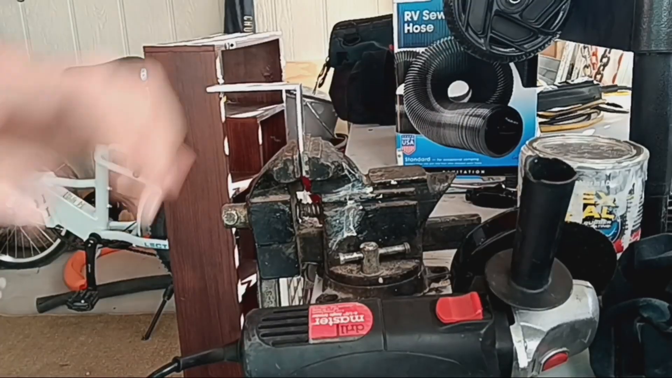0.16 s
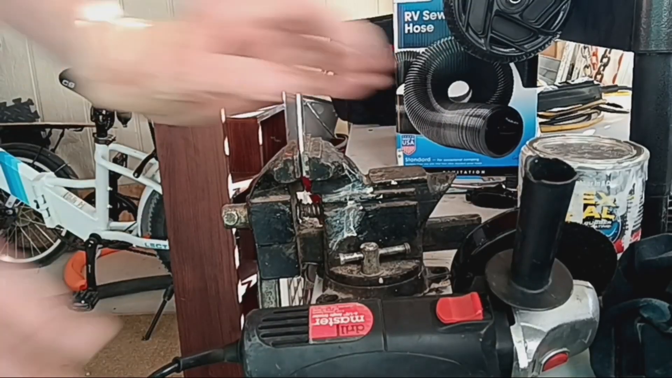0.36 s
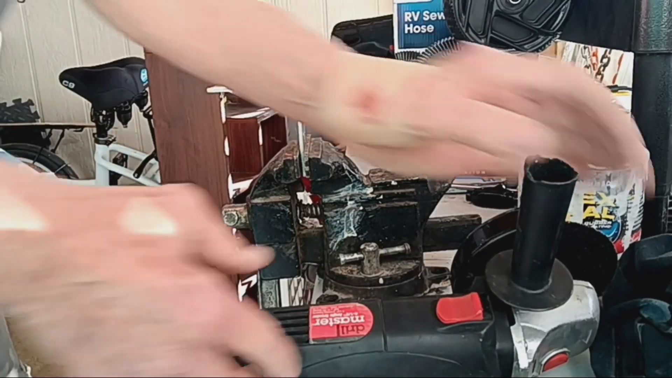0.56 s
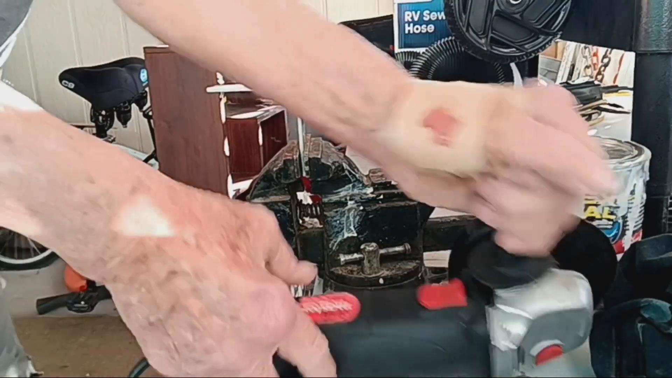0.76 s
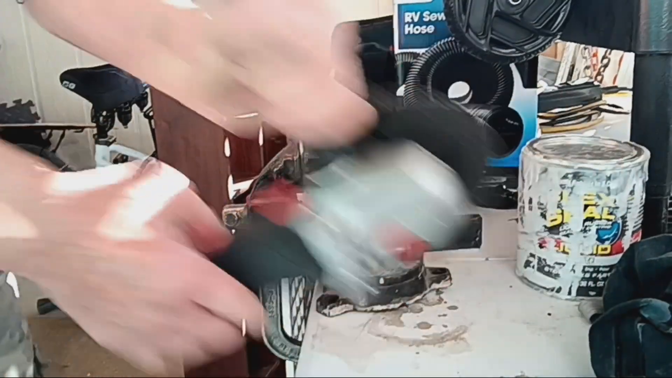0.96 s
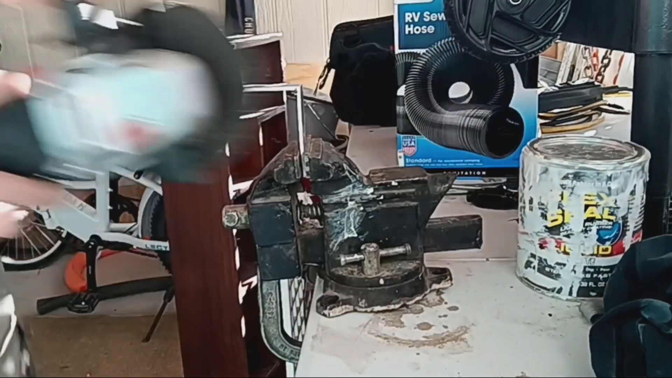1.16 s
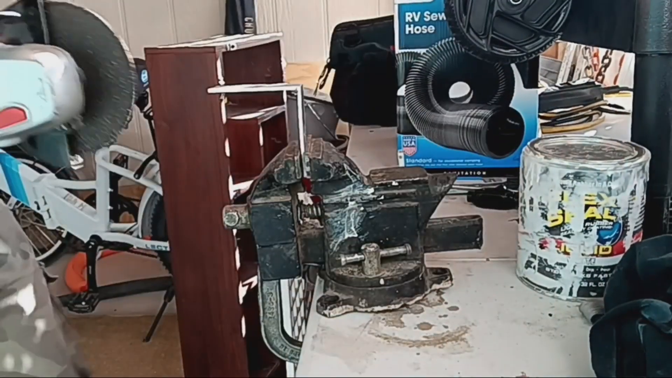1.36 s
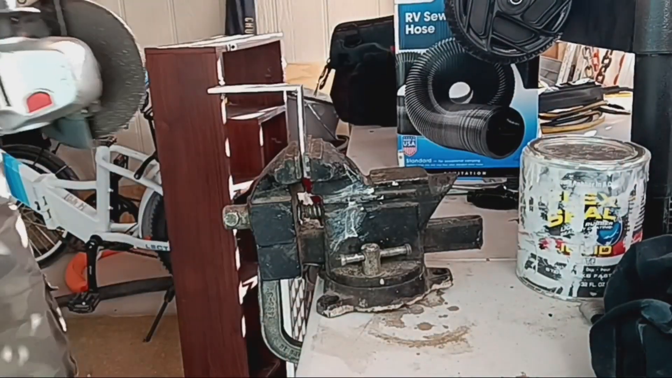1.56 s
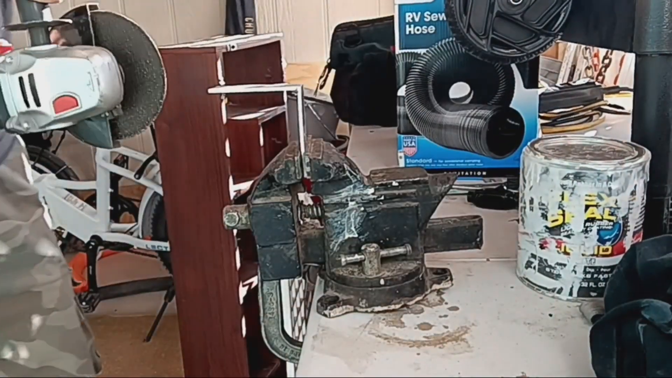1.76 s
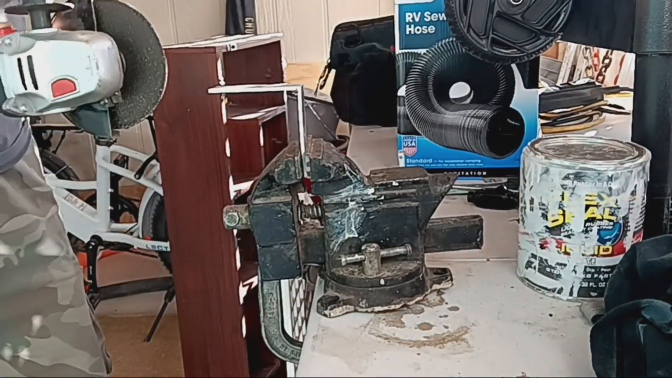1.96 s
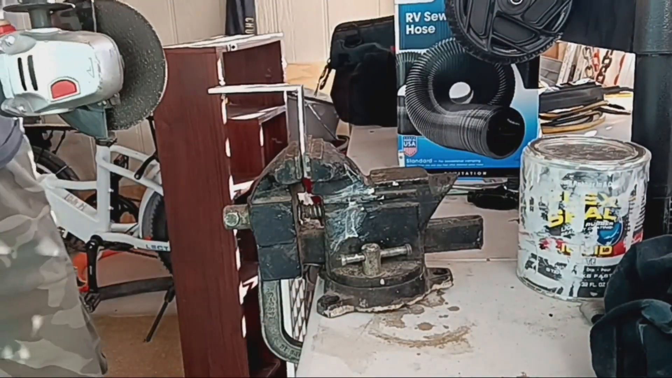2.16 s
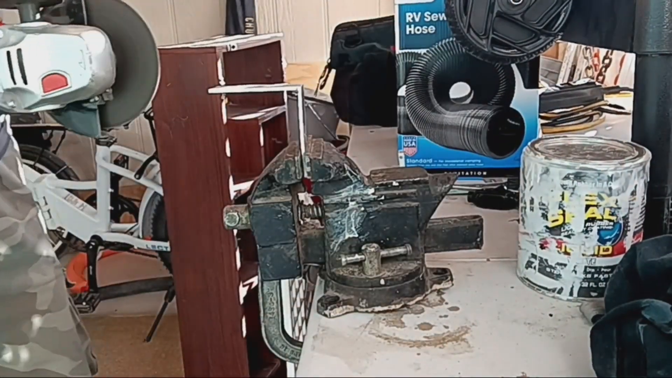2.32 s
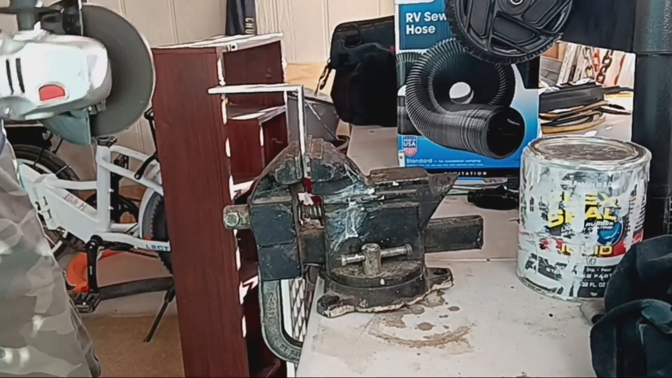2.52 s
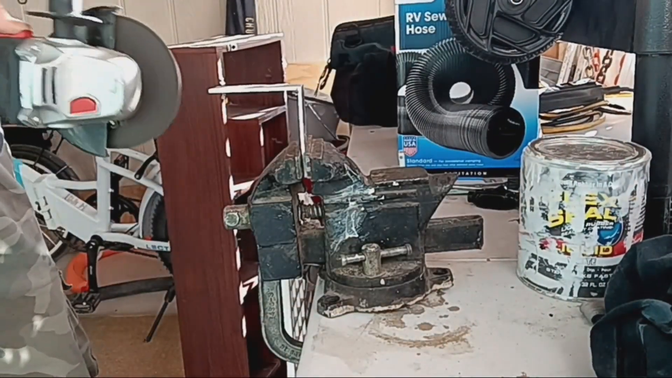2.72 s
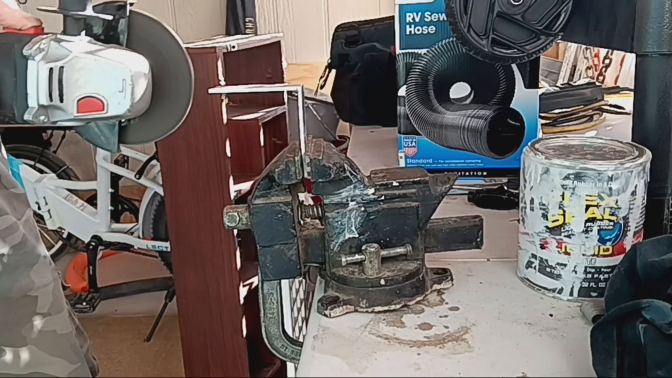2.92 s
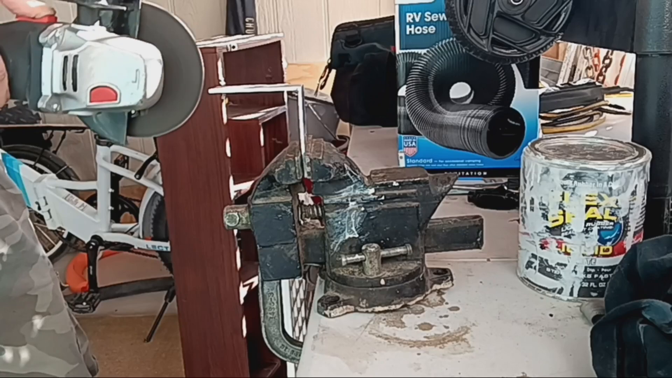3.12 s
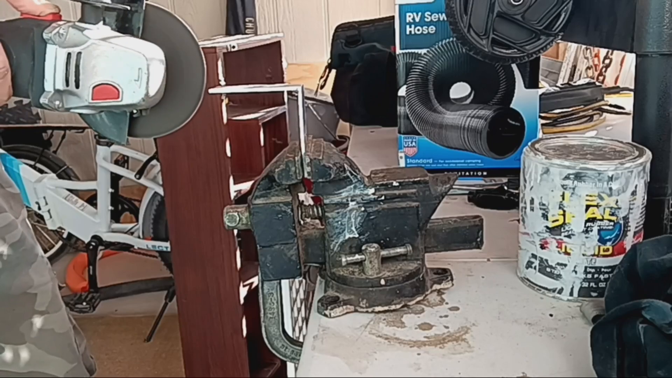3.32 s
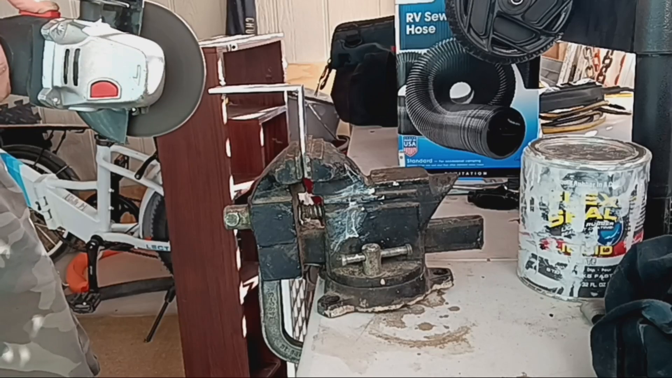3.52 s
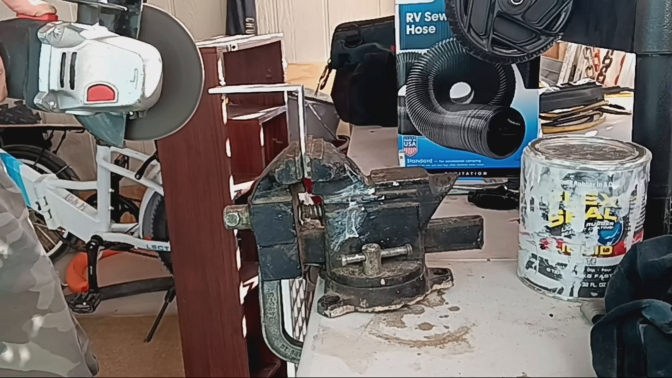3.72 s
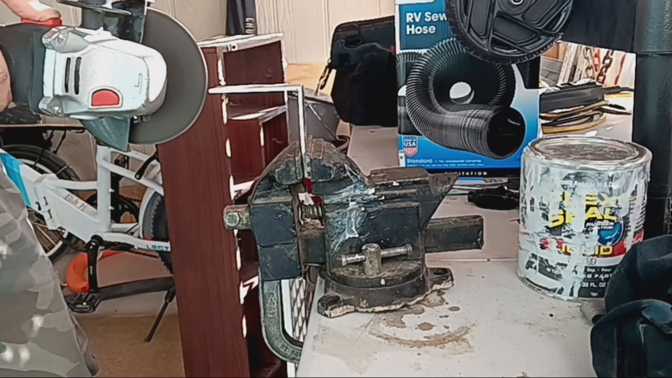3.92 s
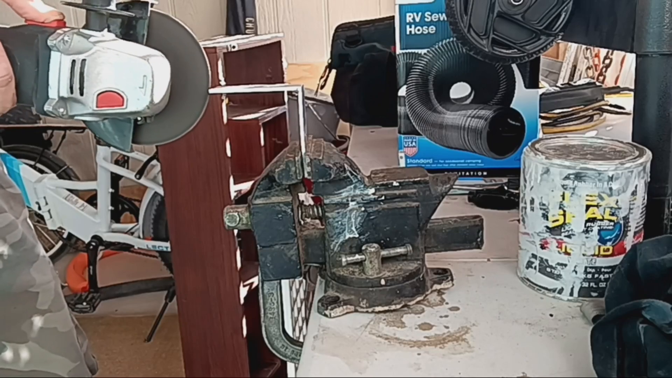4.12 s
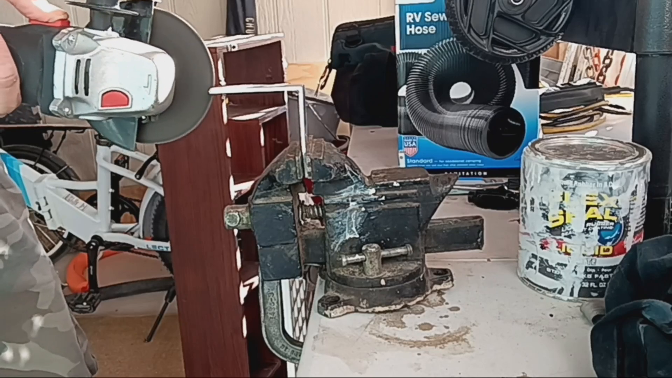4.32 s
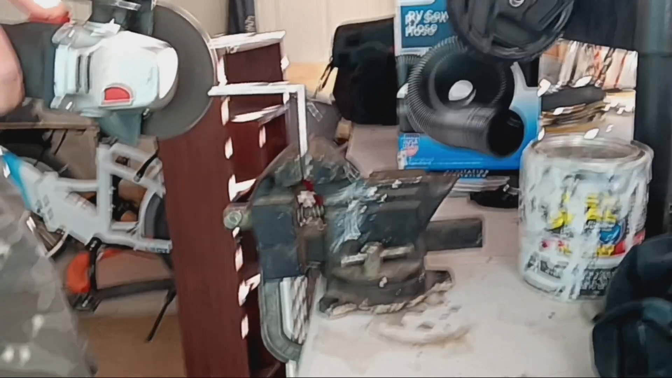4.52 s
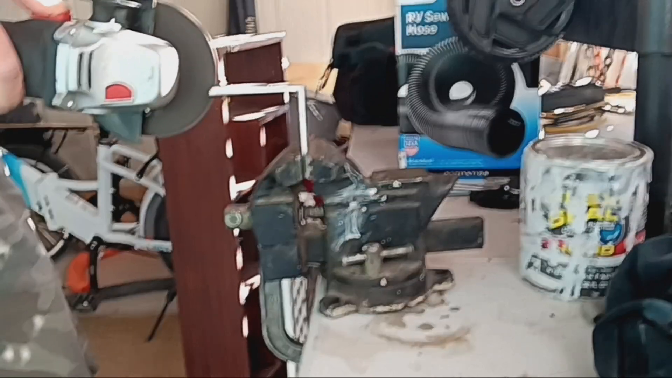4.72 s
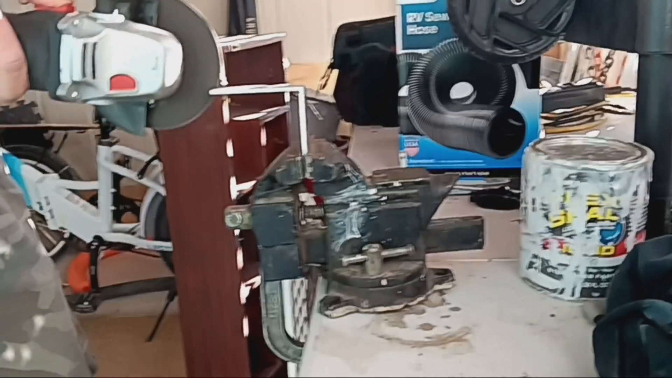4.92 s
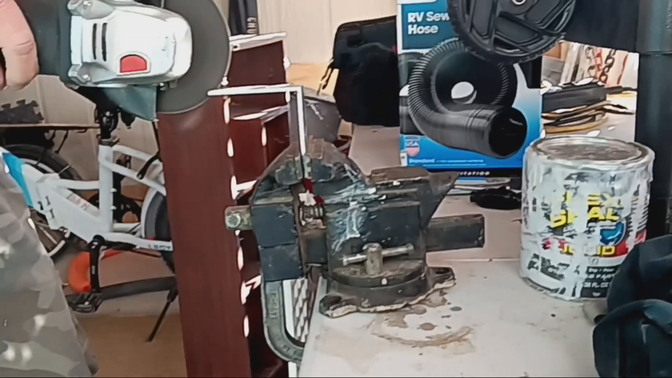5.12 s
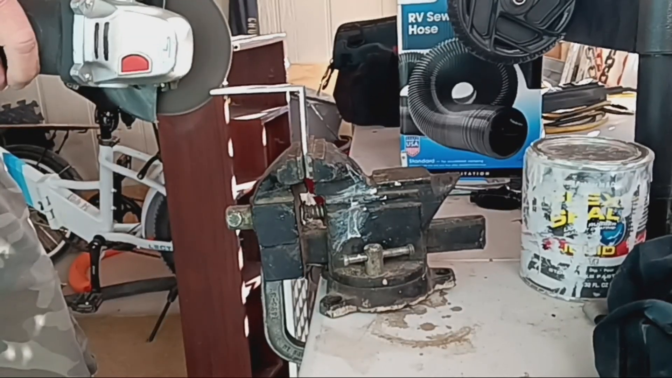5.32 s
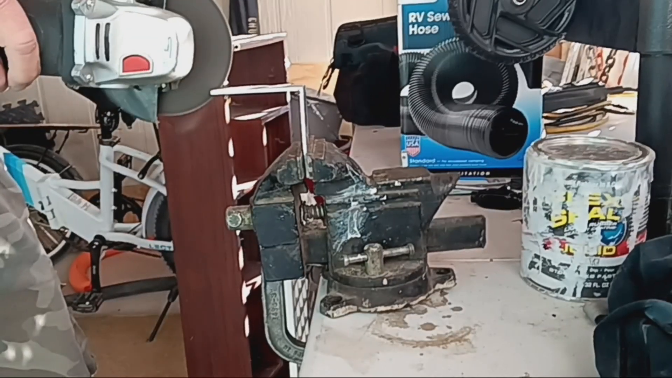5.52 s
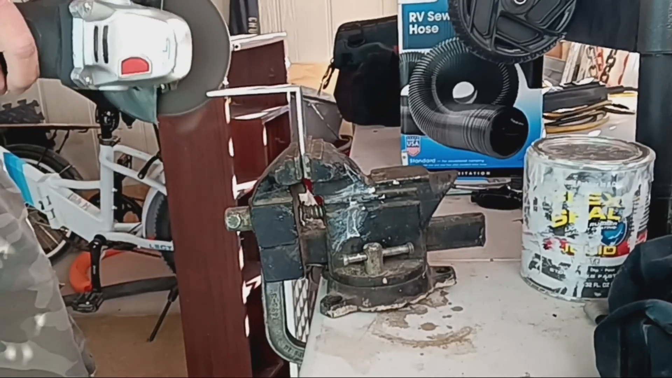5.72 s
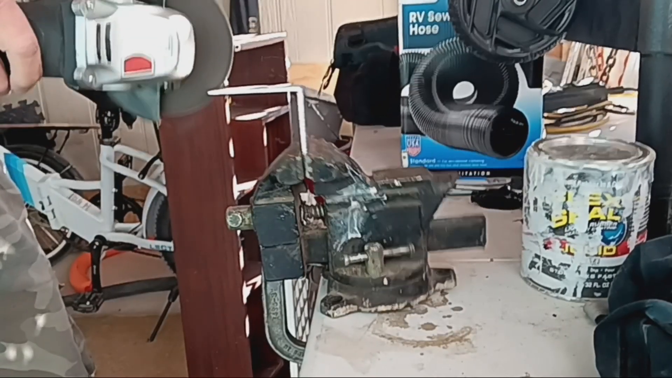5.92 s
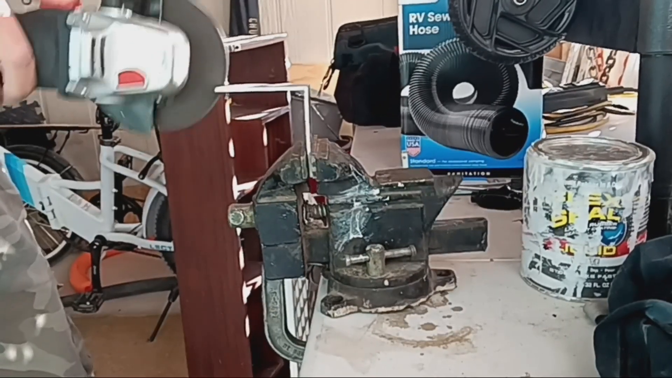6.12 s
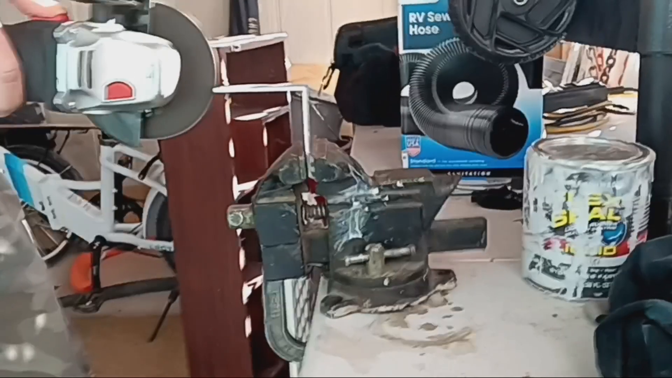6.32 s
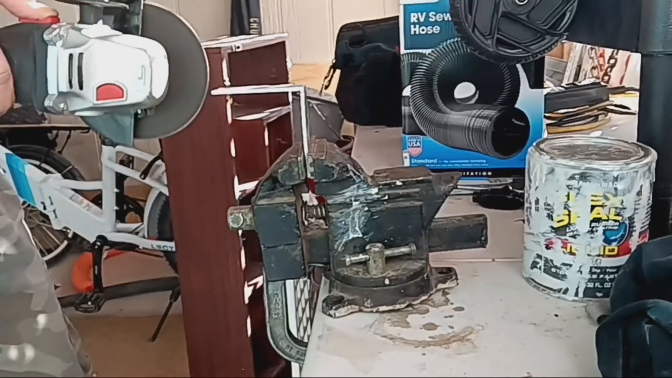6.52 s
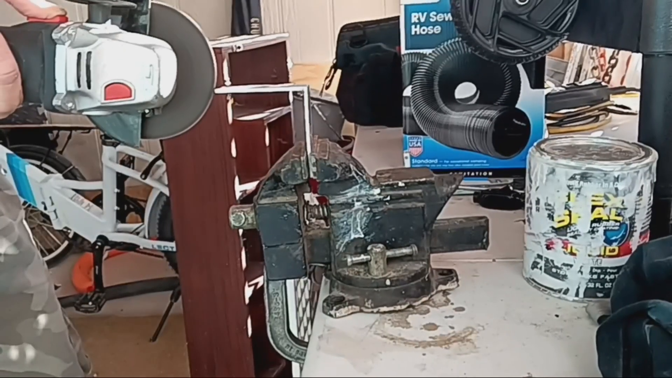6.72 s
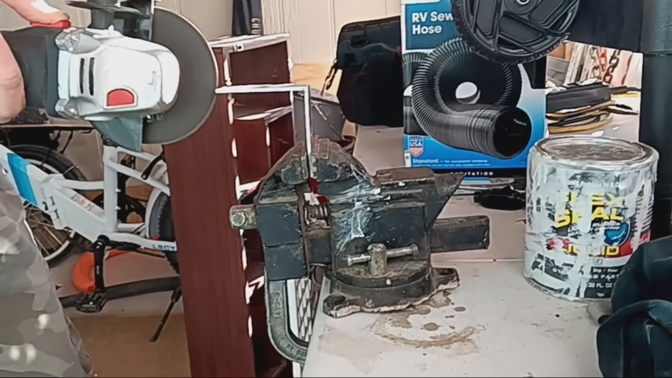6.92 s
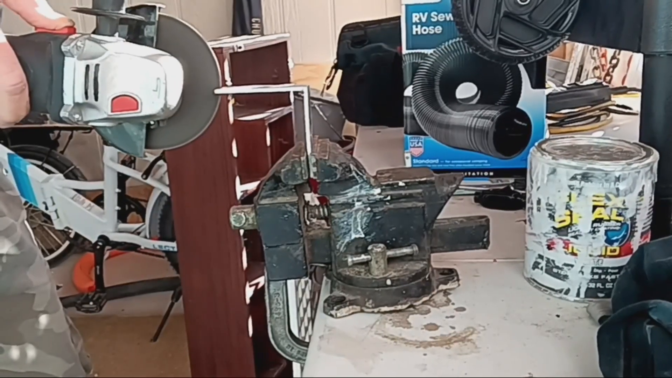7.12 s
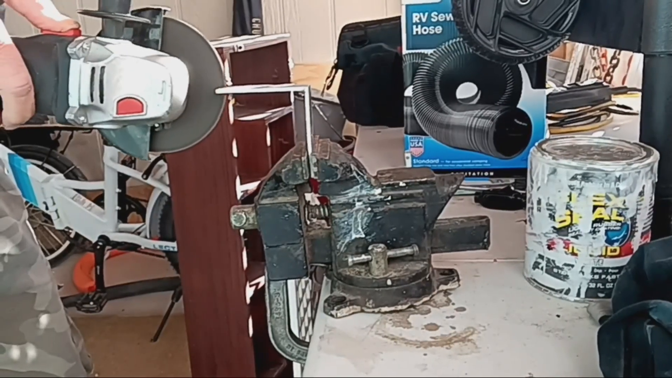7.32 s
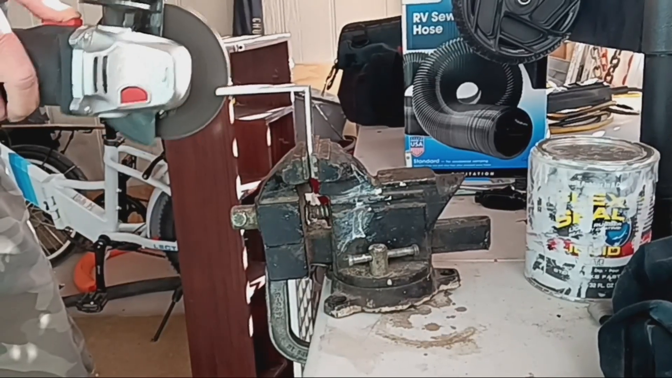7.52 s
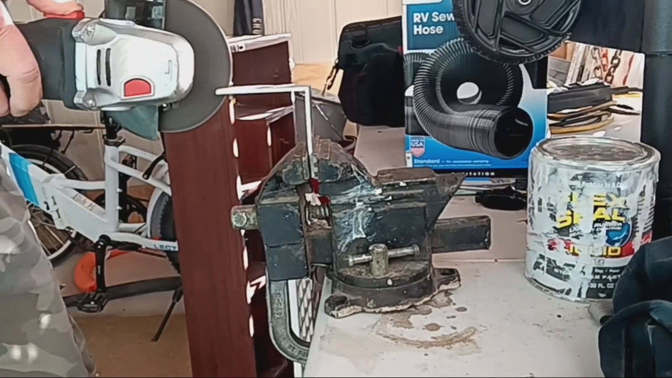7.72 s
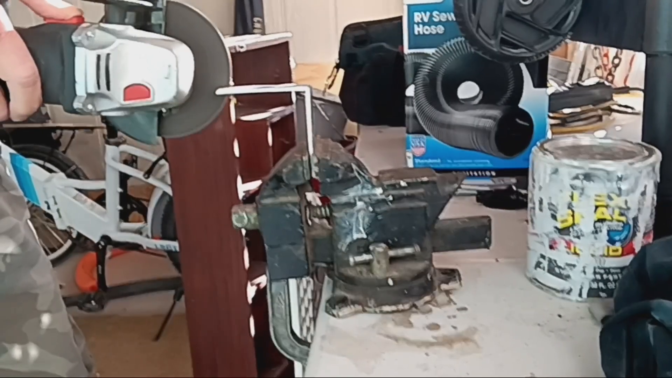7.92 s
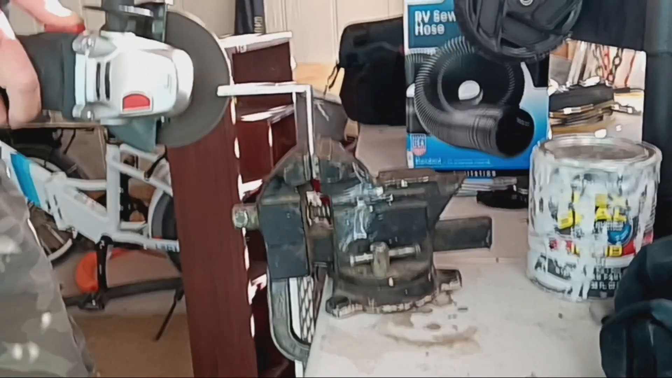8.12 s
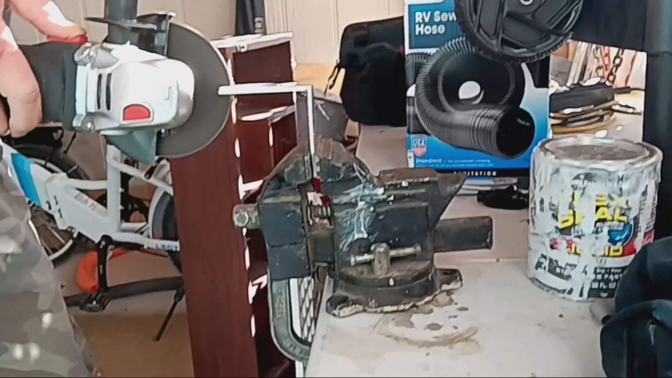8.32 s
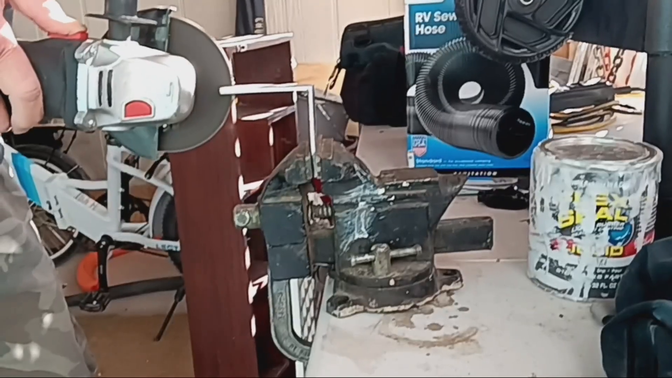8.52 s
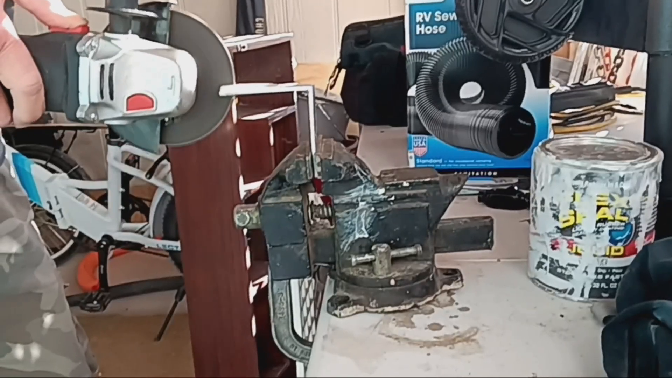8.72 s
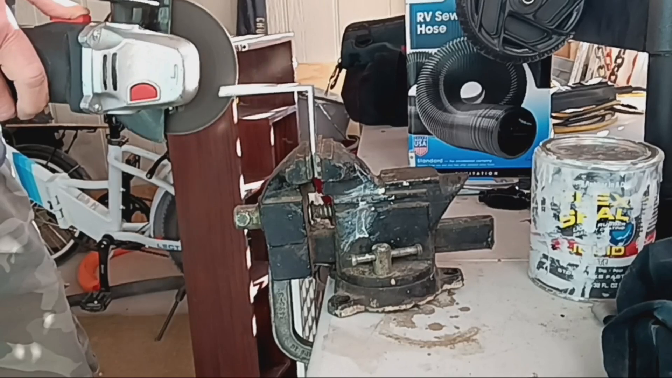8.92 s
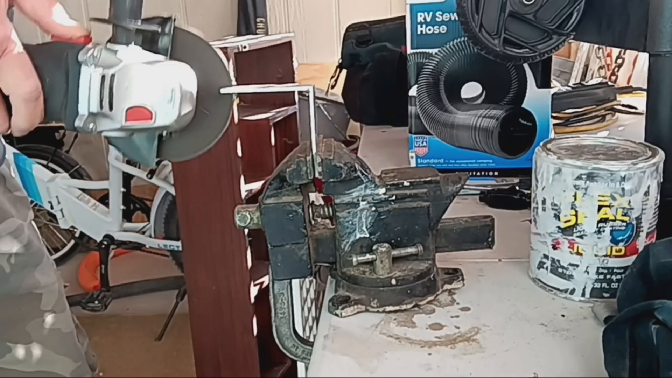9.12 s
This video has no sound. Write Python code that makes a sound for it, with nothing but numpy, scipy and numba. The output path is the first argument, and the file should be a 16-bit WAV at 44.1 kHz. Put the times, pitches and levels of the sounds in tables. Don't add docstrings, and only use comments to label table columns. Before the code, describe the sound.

From 0 to 2 seconds it is quiet in a small garage: soft rubbing and dry plastic rustling, a heavy bump near 0.65 as the grinder is lifted, a loud click just before 1.0, a knock around 1.4 and tiny cable ticks. At about 2.15 the switch clicks and the motor bursts on with a short throb, quickly becoming a loud, metallic, hissing roar whose hum climbs in pitch. A deep thump lands near 3.2. At 4.1 the disc meets the steel with pops, and harsh grinding, high squeals and rumbling microphone overload continue until about 6.1. The tool then runs free, rattling and whirring as it recovers speed. After a jolt near 6.9 and a few skipping touches, the second cut bites at 7.25, screeching and distorted, with jolts near 9.0 and 9.1, and ends abruptly at about 9.2 still running.

```python
import sys
import numpy as np
from scipy import signal
from scipy.fft import rfft, irfft, next_fast_len
from scipy.io import wavfile
from scipy.ndimage import uniform_filter1d
from numba import njit

SR = 44100
rng = np.random.default_rng(int(sys.argv[2]) if len(sys.argv) > 2 else 0)


def dump_mix(stems):
    frames = np.atleast_2d(stems).T
    limited = np.clip(frames, -1, 1)
    pcm = np.round(limited * 32767).astype(np.int16)
    wavfile.write(sys.argv[1], SR, pcm)


def ratio_of_db(decibels):
    return 10 ** (np.asarray(decibels, float) / 20)


N = 403956
TIME = np.arange(N) / SR
SWITCH_S, HANDLING_S = 2.157, 2.25


# (time [s], level [dB])
FACING = [(2.17, 4), (2.25, 0), (2.55, 0.4), (3.7, 1.5), (4.1, 2), (4.77, 1.5), (5.92, 1.5), (6.05, 0.5),
          (6.12, 3), (6.21, -2), (6.6, 0.7), (6.96, 0.5), (7.15, 3), (7.27, -0.5), (7.69, 0.5), (8.92, 0.4),
          (9.04, -2), (9.16, 0)]


def motor(bite_db):
    since = np.maximum(TIME - SWITCH_S, 0)
    facing_db = np.interp(TIME, *np.transpose(FACING))
    wake = np.exp(-(since / 0.015) ** 2)
    load = np.clip(bite_db.mean(axis=0) / 20 + 1.5, 0, 1)
    mains_hz = 60
    throb = 1 + 0.75 * np.exp(-since / 0.076) * np.cos(4 * np.pi * mains_hz * (TIME - 2.175))
    housing_db = -24.5 - 6 * load + 0.85 * facing_db - 26 * wake
    fan_db = -14 - 0.45 * load + 1.45 * facing_db - 21 * wake - 2.5 * np.exp(-since / 0.8)
    brush_db = -12 + 1.03 * facing_db - 12 * wake
    fan, brushes = fan_and_brushes(load, since)
    out = ratio_of_db(housing_db) * housing_chatter() + ratio_of_db(fan_db) * fan + ratio_of_db(brush_db) * brushes
    return (out + armature_hum()) * np.clip(since / .001, 0, 1) * throb


# (centre [Hz], width [Hz], left level [dB], right level [dB])
HOUSING = [(1490, 370, -9.5, -11.5), (2190, 530, -7.5, -7.5), (3200, 450, 6, 2), (4416, 290, 3, 6),
           (4894, 140, 3, 0), (5600, 470, 1, 4.5), (6350, 1000, -3, 5), (6870, 90, -1, -6),
           (2575, 330, -7, -7.5), (3505, 99, -2.5, -7), (5134, 110, -3, -4), (5480, 67, -10, -8),
           (6026, 140, -2, -9.5), (7170, 250, -3.5, -16), (8670, 280, -17, -2)]


def housing_chatter():
    chatter = pair(0.58)
    out = np.zeros((2, N))
    for hz, width, *db in HOUSING:
        level = ratio_of_db(np.c_[db] + 1.2 * walk(11))
        out += level * ring(chatter, hz * (1 + 0.0084 * walk(4)), width)
    return out


# (frequency [Hz], density [dB per Hz])
ROAR = [(40, -36), (200, -15.5), (800, -12.5), (1500, -5), (2800, 4), (6000, 2.5), (9000, 2.5), (16000, -5)]


def fan_and_brushes(load, since):
    roar = unit(colour(pair(0.28), ROAR)) * ratio_of_db(0.86 * walk(35))
    fan = colour(roar, [(20, 0), (6500, 0), (8500, -40), (20000, -40)])
    air = colour(roar, [(20, -40), (10300, -40), (11300, 0), (20000, 0)])
    hiss = (roar - fan - air) * rattle(3.0 * (1 - load))
    return fan, hiss + air * ratio_of_db(-7 * np.exp(-since / 0.25))


# (start [s], end [s], first speed [Hz], time to halve the shortfall [s], hum [dB])
RUN_UPS = [
    (2.25, 4.12, 250, .28, -0.5),
    (6.19, 6.95, 442, .5, -3),
]
# (speed [Hz], level [dB])
HUM = [(250, -49), (370, -40.5), (445, -41.5), (500, -48.5), (540, -52), (552, -58)]


def armature_hum():
    free_hz = 593
    out = np.zeros((2, N))
    for start, end, from_hz, half_s, db in RUN_UPS:
        hz = free_hz - (free_hz - from_hz) / (1 + np.maximum(TIME - start, 0) / half_s)
        turn = 2 * np.pi * np.cumsum(hz) / SR
        hum_db = np.interp(hz, *np.transpose(HUM)) + db + stroke(start + 0.036, end, .05, .05)
        tone = np.array([0.47 * np.sin(turn - 1.3), np.sin(turn)])
        out += ratio_of_db(hum_db + 7.0 + 2.3 * walk(12)) * tone
    return out


# (centre [Hz], width [Hz], change [dB])
NOTCHES = [(2860, 57, -4), (3717, 170, -4), (4640, 70, -2.5), (5340, 74, -5), (6630, 52, 1),
           (7640, 160, -3.5), (8340, 100, -3), (13400, 250, 2)]


def notched(x):
    size = next_fast_len(N)
    hz = np.fft.rfftfreq(size, 1 / SR)
    change_db = sum(db * np.exp(-((hz - f) / width) ** 2) for f, width, db in NOTCHES)
    return irfft(rfft(x, size) * ratio_of_db(change_db), size)[..., :N]


# (start [s], end [s], overload [dB], left minus right [dB])
BITES = [(4.127, 4.327, -29, 1), (4.154, 4.164, -19.5, 2), (4.198, 4.298, -22, 1), (4.334, 5.989, -15, 4.5),
         (6.017, 6.06, -25.5, 3), (6.066, 6.14, -19.5, 5.5), (6.147, 6.179, -23.5, 3),
         (6.995, 7.015, -28, 5), (7.062, 7.101, -28.5, 5), (7.16, 7.173, -23.5, 7), (7.19, 7.209, -25.5, 6),
         (7.255, 9.032, -15, 5), (9.035, 9.2, -16, 5)]


def contact_db():
    lean_db = leaning_db()
    level = ratio_of_db(-33 + stroke(6.95, 7.25, 0.066, .04)) + 1e-6
    for start, end, db, pan_db in BITES:
        ports_db = np.array([[5.0 + pan_db / 2], [7.5 - pan_db / 2]])
        level = level + ratio_of_db(db + lean_db + stroke(start, end, 0.015, 0.017) + ports_db)
    return 20 * np.log10(level)


# (time [s], level [dB])
LEANS = [(4.36, -1), (4.44, 0.5), (4.52, -2.5), (4.62, 0), (4.79, -0.5), (5.05, -0.5), (5.09, 0),
         (5.19, -2), (5.36, -1.5), (5.44, 0.5), (5.77, 0.5), (5.84, -3), (5.89, 0.5), (6.1, 3.5), (7.3, 0),
         (7.63, 0.5), (7.91, -1), (7.94, -1.5), (8.01, -2), (8.1, -2), (8.15, -3), (8.27, -2), (8.79, 2),
         (8.55, 0.5), (8.98, -3), (9.04, -5), (9.11, -2)]


def leaning_db():
    return sum(db * np.exp(-((TIME - s) / 0.026) ** 2) for s, db in LEANS)


# (start [s], end [s], centre [Hz], width [Hz], level [dB])
SQUEALS = [(4.12, 4.36, 9255, 90, -22), (4.18, 4.85, 11855, 170, -22), (4.3, 4.8, 8735, 70, -18.5),
           (4.62, 5.25, 10450, 150, -22), (5.28, 6.0, 11405, 180, -21.5), (4.2, 6.15, 6925, 180, -25),
           (6.04, 6.14, 10755, 450, -21), (7.46, 7.72, 10800, 150, -19), (7.62, 8.16, 10470, 150, -18),
           (8.42, 8.66, 10050, 110, -19), (8.6, 8.85, 9900, 200, -23), (8.76, 9.04, 9480, 130, -22),
           (4.45, 4.65, 12705, 200, -27), (5.75, 6.0, 11050, 250, -24), (4.85, 5.15, 12750, 200, -29)]
# (start [s], end [s], centre [Hz], width [Hz], level [dB])
RINGS = [(4.13, 4.6, 10560, 170, -23), (4.6, 4.8, 14955, 150, -28), (6.866, 6.9, 10855, 90, -12.5),
         (6.97, 7.95, 8660, 110, -23.5), (8.0, 8.5, 10290, 190, -18.5), (8.55, 8.95, 10260, 200, -22),
         (8.98, 9.2, 10255, 300, -21), (7.3, 9.2, 6875, 220, -28), (5.0, 5.2, 11505, 200, -24.5),
         (5.3, 6.1, 15725, 80, -27), (4.95, 6.0, 9405, 150, -26), (4.8, 6.1, 7945, 160, -25),
         (5.12, 6.06, 10270, 110, -20.5), (7.26, 7.52, 10720, 280, -20), (7.1, 7.24, 10700, 350, -23),
         (6.97, 7.26, 9180, 130, -24), (7.0, 7.2, 6990, 110, -22), (7.4, 8.9, 7980, 120, -28),
         (8.0, 9.2, 8480, 100, -24), (9.05, 9.2, 9250, 200, -21), (5.2, 6.0, 8660, 130, -27)]
# (start [s], end [s], centre [Hz], width [Hz], level [dB])
WHINES = [
    [(2.18, 2.4, 2520, 270, -24.5), (2.18, 2.55, 3800, 130, -24), (2.55, 3.6, 3260, 200, -31),
     (2.18, 2.3, 6950, 120, -23), (2.18, 2.45, 8200, 190, -21), (6.2, 6.9, 1540, 78, -37.5),
     (2.17, 4.1, 1474, 210, -34)],
    [(2.2, 3.3, 4375, 120, -27), (3.65, 4.15, 4900, 140, -23.5), (6.5, 7.3, 6930, 110, -29),
     (2.2, 2.6, 9360, 920, -24.5)],
]
# (start [s], end [s], centre [Hz], width [Hz], level [dB])
GEARS = [
    (2.56, 2.7, 2195, 40, -26),
    (6.2, 6.36, 190, 15, -47),
]
# (start [s], end [s], centre [Hz], width [Hz], level [dB])
FLUTTERS = [
    (6.21, 6.5, 4370, 45, -21),
    (6.44, 6.7, 4375, 40, -22),
    (6.68, 6.88, 4350, 40, -21.5),
    (6.95, 7.02, 4400, 60, -23),
]


def squeals():
    cut = glides(SQUEALS, -.024, 0.9, 0.29) + glides(RINGS, -.01, 0.8, 0.29)
    whines = glides(WHINES[0], 0, 1.7, 1.8) + glides(WHINES[1], 0, -3.5, 2.9, rattle_db=5.5)
    gears = glides(GEARS, .065, 2.7, 0) + glides(FLUTTERS, 0, -1.0, 0.67, rattle_db=8.5)
    return cut + whines + gears


# (frequency [Hz], density [dB per Hz])
SPLATTER = [
    [(20, -8.5), (60, 1.5), (300, 0), (1000, -7), (2500, -10), (6000, -19.5), (16000, -39)],
    [(20, -12), (60, 2), (300, 0.5), (1000, -6.5), (2500, -6), (6000, -9.5), (16000, -12.5)],
]
# (frequency [Hz], density [dB per Hz])
GRIT = [(300, -21), (700, 0.5), (1500, -2.5), (3000, -18)]


def overload(bite_db):
    kicks = rng.standard_normal((2, N)) * ratio_of_db(2.46 * rng.exponential(size=(2, N)))
    bursts = ratio_of_db(np.array([1.96 * walk(90) + 1.0 * walk(12) + 1.1 * walk(35) for _ in range(2)]))
    kicks = kicks * bursts
    splatter = np.array([unit(colour(k, c)) for k, c in zip(kicks, SPLATTER)])
    grit = ratio_of_db(-14.5 + 3.6 * leaning_db()) * unit(colour(kicks, GRIT))
    slips = rng.uniform(-1, 1, (2, N)) * (rng.random((2, N)) < 45 / SR)
    pops = unit(colour(slips, [(25, -10), (65, -2.5), (250, -3.0), (700, -8.0), (3000, -46)]))
    return ratio_of_db(bite_db) * (splatter + grit) + ratio_of_db(-46.0) * pops * (TIME > SWITCH_S)


# (time [s], thump [dB], crack
# minus thump [dB], left minus right [dB])
KNOCKS = [(0.409, -48, -5, 0), (0.443, -42, -2, 0), (0.661, -13.5, -10, 3), (1.193, -44, -17, 0),
          (1.422, -21.5, 0.5, 0), (1.849, -43, 0.5, 0), (1.904, -33.5, -2, -0.5), (2.268, -29, 5, -1),
          (2.437, -28.5, -5, -3), (3.1674, -10, -22, -1), (3.355, -39, 0, 0), (3.452, -35, 2, 0),
          (3.48, -43, 5, 2), (3.835, -45, 17, 0)]
# (time [s], thump [dB], crack minus thump [dB], left minus right [dB])
JOLTS = [
    (4.1197, -11.5, -14, -1),
    (4.214, -10.5, -19, 11),
    (6.021, -10.5, -15, -9),
    (6.5997, -11.5, -22, -2),
    (6.996, -25, -3, -2),
    (7.189, -18, -11, -11),
    (7.233, -9, -16, -2),
    (9.02, -16, -16, 2),
    (9.12, -7, -16, 0),
]
# (time [s], thump [dB], crack minus thump [dB], left minus right [dB], swing [Hz])
BUMPS = [
    (.59, -37, -23, 14, 136),
    (.627, -38, -25, 6, 270),
    (.641, -26.5, -28, 15, 251),
    (0.73, -33.5, -24, 11, 325),
    (6.8731, -16.5, -2, 8, -120),
    (6.878, -14, -5, 9, 22),
    (7.167, -22, -7, 5, 110),
]


def knocks():
    out = np.zeros((2, N + SR))
    t = np.arange(SR // 8) / SR
    for s, db, crack_db, pan_db, hz in [k + (66.5,) for k in KNOCKS] + [j + (60.5,) for j in JOLTS] + BUMPS:
        turns = abs(hz) * (0.74 * t + 0.0064 * (1 - np.exp(-t / 0.0082)))
        rise = np.minimum(0.54 + t / .014, 1) * np.minimum(t / 0.00047, 1)
        swing = 1.53 * np.sin(2 * np.pi * turns + 1.45) * rise * np.exp(-(t / 0.016) ** 1.46)
        scrape = uniform_filter1d(rng.standard_normal(len(t)), size=12) * np.exp(-t / 0.0038)
        shove = np.exp(-((t - .0008) / 0.00018) ** 2) + 0.87 * scrape
        crack = svf(uniform_filter1d(shove, size=9), 800 + 0 * t, 3000.0)
        hit = np.sign(hz) * ratio_of_db(db) * (swing + ratio_of_db(crack_db + 11.5) * crack)
        first = int(s * SR)
        out[:, first:first + len(t)] += hit * pan(pan_db)
    return out[:, :N]


# (time [s], level [dB], 60 dB decay [s])
TICKS = [
    (0.7282, -26, 0.027),
    (0.8766, -30, 0.03),
    (1.37, -38, .04),
    (0.9785, -17.5, 0.08),
    (1.309, -40, 0.04),
    (1.906, -40, 0.064),
    (2.159, -25, 0.04),
]
# (time [s], level [dB], 60 dB decay [s])
SNICKS = [(0.7657, -37, 0.051), (1.0075, -36, 0.036), (1.0296, -47, .055), (1.339, -41, 0.075),
          (1.4306, -33, .04), (1.4514, -41, .06), (1.4614, -43, .06), (1.5065, -42, .06),
          (1.5294, -43, .06), (1.5444, -40, 0.055), (1.616, -37, 0.066), (1.6586, -45, .06),
          (1.698, -40, .06), (1.722, -28, .11), (1.8936, -44, .046), (1.962, -55, .05)]


def ticks():
    out = np.zeros((2, N + SR))
    t = np.arange(SR // 8) / SR
    kinds = ((TICKS, 4020, .95, [[3.0], [3.0]]), (SNICKS, 11300, .5, [[-4.0], [9.0]]))
    for table, hz, spread, ports_db in kinds:
        for s, db, t60 in table:
            fall = np.exp(-t / 0.00045) + 0.2 * ratio_of_db(-60 * t / max(t60, .005))
            click = fall * ring(rng.standard_normal((2, len(t))), hz, spread * hz)
            first = int(s * SR)
            out[:, first:first + len(t)] += ratio_of_db(db + np.array(ports_db)) * click
    return out[:, :N]


STILL_DB = -79
# (peak [s], level [dB], swell [s], fade [s])
RUBS = [(0., -58.5, .01, 0.23), (.135, -60, .08, .08), (.35, -56, .03, 0.045), (.56, -46, 0.14, 0.25),
        (.73, -35, 0.0066, 0.033), (.79, -57, .05, .08), (.99, -59, 0.03, 0.12),
        (1.34, -53.5, 0.037, 0.074), (1.57, -64, 0.098, 0.045), (1.92, -48, 0.033, .1),
        (1.99, -49.5, .1, 0.06), (2.15, -62, .09, .05)]
# (frequency [Hz], density [dB per Hz])
RUB = [(400, -28), (900, 7), (2500, 13.5), (4000, -5), (6000, -29), (9000, -28)]
# (peak [s], level [dB], swell [s], fade [s])
RUSTLES = [(0., -64, .01, .03), (.35, -56, .03, .04), (.58, -54, 0.18, .1), (.72, -40, 0.19, 0.074),
           (.89, -32.5, 0.11, 0.17), (1.01, -37.5, .04, 0.083), (1.325, -45.5, 0.038, .07),
           (1.08, -60, .05, .1), (1.44, -49, .08, 0.055), (1.99, -66, .08, .06), (1.73, -62, .06, .055)]
# (frequency [Hz], density [dB per Hz])
RUSTLE = [(3000, -23), (6000, -5), (8000, -3), (11000, 0), (13000, -19), (16000, -28)]
# (start [s], end [s], centre [Hz], width [Hz], level [dB])
SCUFFS = [
    (.84, .94, 1260, 350, -55),
    (.8, 1.1, 3000, 500, -61),
    (1.5, 1.62, 1200, 900, -70),
    (1.86, 1.9, 1500, 1000, -66),
    (0.79, 0.95, 5800, 900, -58),
    (1.31, 1.39, 750, 300, -64),
    (1.3, 1.38, 5700, 900, -60),
]


def hands():
    rub = gestures(RUBS, STILL_DB) * ratio_of_db(-2.5 + 2.0 * walk(61.4)) * patchy(pair(0.39), RUB, 4.0)
    grains = ratio_of_db(np.array([[-3.0], [-1.5]]) + 3.3 * walk(150))
    rustle = gestures(RUSTLES, STILL_DB) * grains * patchy(pair(0.28), RUSTLE, 2.0)
    return rub + rustle + glides(SCUFFS, 0, 0, 2.0)


# (peak [s], level [dB], swell [s], fade [s])
BENCH = [
    (0., -57, .01, 0.23),
    (.5, -51, 0.12, .2),
    (.7, -39.5, 0.16, 0.18),
    (.9, -65, .1, 0.59),
    (1.48, -59, 0.21, 0.22),
    (2.15, -56, .13, .1),
]
# (peak [s], level [dB], swell [s], fade [s])
RATTLES = [
    (.65, -41, 0.057, 0.1),
    (1.345, -57, 0.035, 0.056),
    (1.6, -68, .1, 0.12),
]
# (frequency [Hz], density [dB per Hz])
RUMBLE = [(25, 8), (65, 9.5), (130, 9.5), (300, -24.5)]


def bench():
    weight = gestures(BENCH, -66)
    shake = rng.standard_normal(N) + 0.36 * rng.standard_normal((2, N))
    rumble = weight * ratio_of_db(1.5 + 5.4 * walk(12)) * unit(colour(shake, RUMBLE))
    rattling = gestures(RATTLES, STILL_DB) + weight * ratio_of_db(-14.5)
    return rumble + rattling * pan(5) * ring(shake, 280.0, 167)


def cavity():
    level = ratio_of_db(-66.5 + 1.1 * walk(6) - 17 * (TIME > 1.78))
    return level * ring(rng.standard_normal((2, N)), 9900.0, 1500)


def glides(table, slide, pan_db, flutter_db, rattle_db=0):
    out = np.zeros((2, N + SR))
    for start, end, hz0, width, db in table:
        n = int((end - start) * SR)
        along = np.arange(n) / n
        level = ratio_of_db(db + 2.4 * walk(14, n) + flutter_db * walk(130, n))
        swell = np.sin(np.pi * along) ** 0.29 * level
        hz = hz0 * (1 + slide * along) + 0.3 * width * walk(12, n)
        first = int(start * SR)
        out[:, first:first + n] += swell * rattle(rattle_db, n) * ring(pair(0.74, n), hz, width)
    return out[:, :N] * pan(pan_db)


def rattle(depth_db, size=N):
    hz = 54.9 * (1 + 0.2 * walk(30, size))
    return ratio_of_db(depth_db * np.cos(2 * np.pi * np.cumsum(hz) / SR))


def patchy(noise, points, patchy_db):
    hz, db = np.transpose(points)
    out, size = np.zeros((2, N)), int(HANDLING_S * SR)
    for f in hz[0] * (hz[-1] / hz[0]) ** np.linspace(0, 1, num=12):
        band_db = np.interp(np.log(f), np.log(hz), db) + 10 * np.log10(f) + patchy_db * walk(18, size)
        out[:, :size] += ratio_of_db(band_db) * ring(noise[:, :size], f, f / 3)
    return out / np.std(out[:, :size])


def gestures(table, still_db):
    power = ratio_of_db(2 * still_db)
    for s, db, swell, fade in table:
        power = power + ratio_of_db(2 * (db + stroke(s, s, swell, fade)))
    return np.sqrt(power)


def stroke(start, end, swell_s, fade_s):
    before = np.maximum(start - TIME, 0) / max(swell_s, .003)
    after = np.maximum(TIME - end, 0) / max(fade_s, .003)
    return -20 * np.minimum(before ** 2 + after ** 2, 9)


def pan(db):
    return ratio_of_db(np.array([[db], [-db]]) / 2)


def walk(rate, size=N):
    k = int(SR / rate)
    steps = np.repeat(rng.standard_normal(size // k + 2), k)
    return uniform_filter1d(steps, k)[k // 2:][:size]


def pair(likeness, size=N):
    shared, own = rng.standard_normal(size), rng.standard_normal((2, size))
    share = np.clip(likeness, 0, 1)
    left_lag = 52
    return np.sqrt(share) * np.array([np.roll(shared, left_lag), shared]) + np.sqrt(1 - share) * own


def ring(x, hz, width):
    centre = hz + 0 * x[0]
    return unit(np.array([svf(svf(c, centre, 1.36 * width), centre, 1.36 * width) for c in x]))


@njit
def svf(x, hz, width):
    y, band, low = np.empty(len(x)), 0., 0.
    for i in range(len(x)):
        g, k = np.tan(np.pi * hz[i] / SR), width / hz[i]
        v = (band + g * (x[i] - low)) / (1 + g * (g + k))
        band, low, y[i] = 2 * v - band, low + 2 * g * v, k * v
    return y


def colour(x, points):
    hz, db = np.transpose(points)
    size = next_fast_len(N)
    gain = ratio_of_db(np.interp(np.log(np.fft.rfftfreq(size, 1 / SR) + 1), np.log(hz), db))
    return irfft(rfft(x, size) * gain, size)[..., :N]


def unit(x):
    return x / np.sqrt(np.mean(x ** 2, axis=-1, keepdims=True))


# (frequency [Hz], level [dB])
PORTS = [
    [(20, 2.5), (1400, 4), (1750, -0.5), (2200, 2.5), (3400, -3), (3800, -2), (4300, -4), (5300, -6.5),
     (6000, -2.5), (8000, -3.5), (9300, -11.5), (10600, -93), (16000, -103)],
    [(20, -3), (1000, 3), (3400, -2), (3800, 0.5), (4300, -3.5), (7000, -1), (7900, -2), (9600, 5.5),
     (11500, 0.5), (14000, 1), (16000, -0.5)],
]


def scene():
    bite_db = contact_db()
    tool = notched(motor(bite_db) + squeals())
    handling = (hands() + bench() + cavity()) * (TIME < HANDLING_S)
    air = tool + handling + ticks()
    heard = np.array([colour(c, p) for c, p in zip(air, PORTS)])
    return heard + knocks() + overload(bite_db)


def low_pass(x):
    return signal.sosfilt(signal.butter(12, 16370, fs=SR, output="sos"), x)


# (frequency [Hz], level [dB])
MUFFLE = [(20, 0), (8400, 0), (9400, -9), (10500, -11), (10900, -45), (11700, -45), (12200, -26),
          (16000, -23)]


def record(dry):
    ceiling = np.array([[1.7], [1.1]])
    soft = ceiling * np.tanh(dry / ceiling)
    soft[0] = colour(soft[0], MUFFLE)
    steep = signal.ellip(10, .2, 70, 15750, fs=SR, output="sos")
    mix = np.clip(signal.sosfilt(steep, soft), -1, 1)
    return low_pass(mix)


dry = scene()
out = record(dry)
dump_mix(out)
```